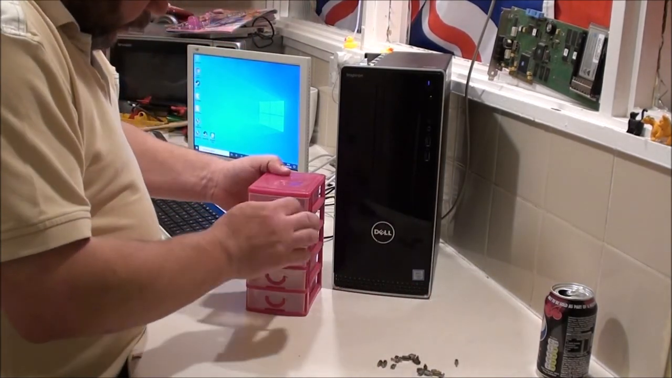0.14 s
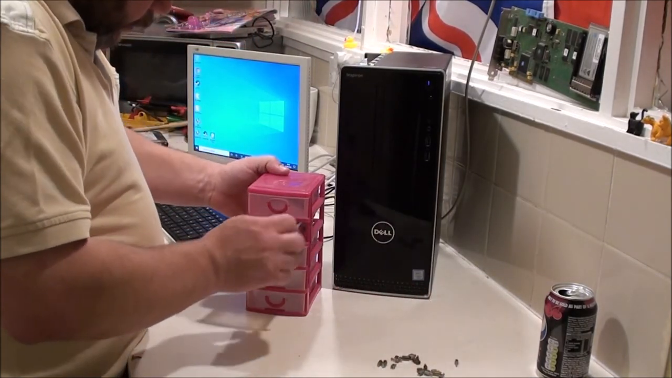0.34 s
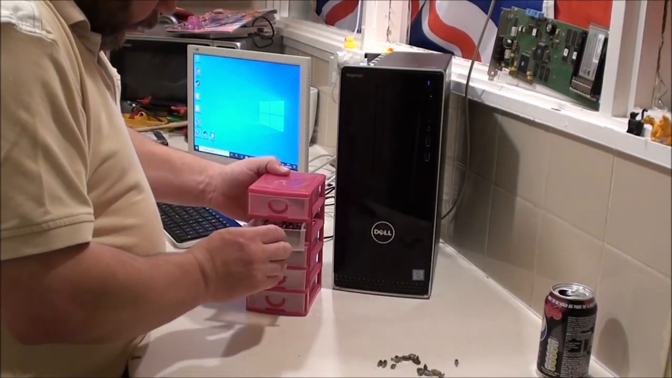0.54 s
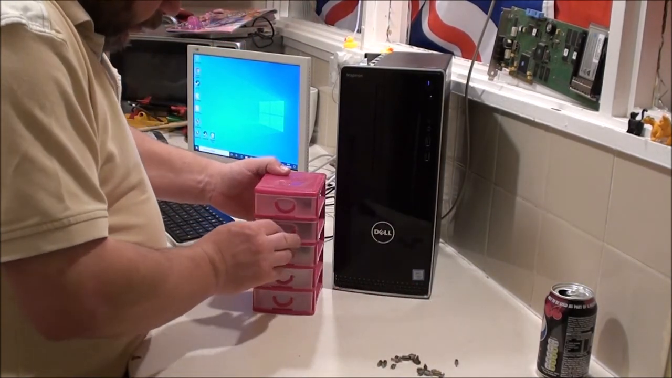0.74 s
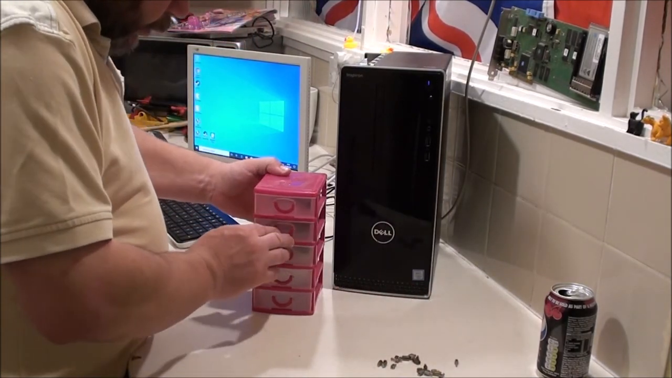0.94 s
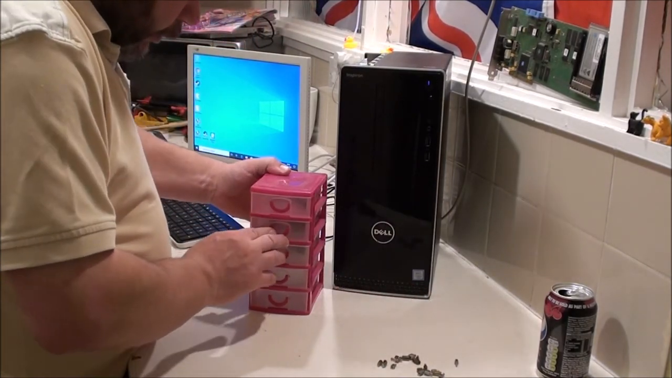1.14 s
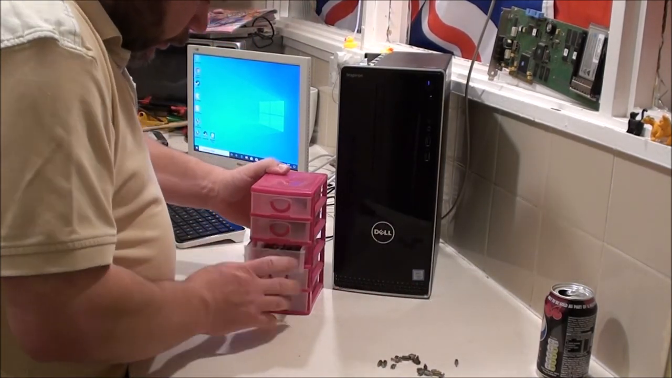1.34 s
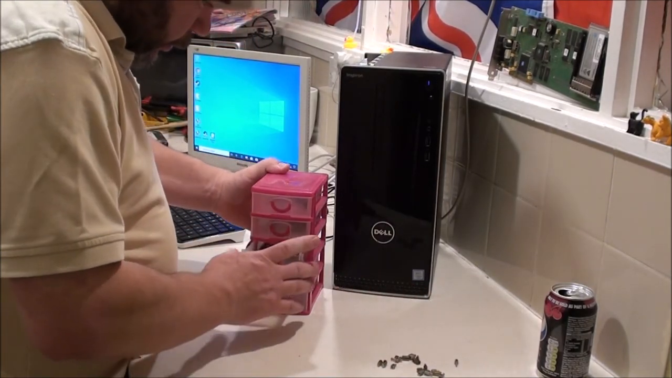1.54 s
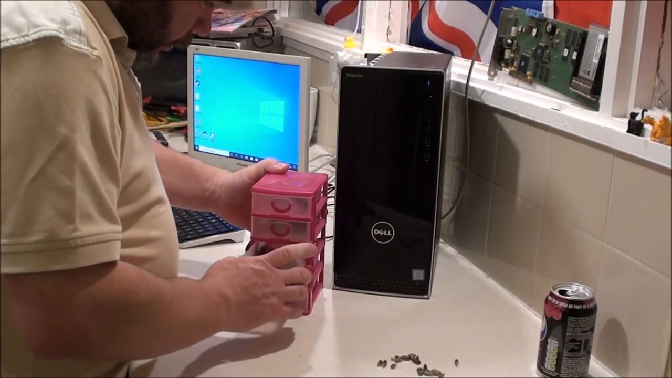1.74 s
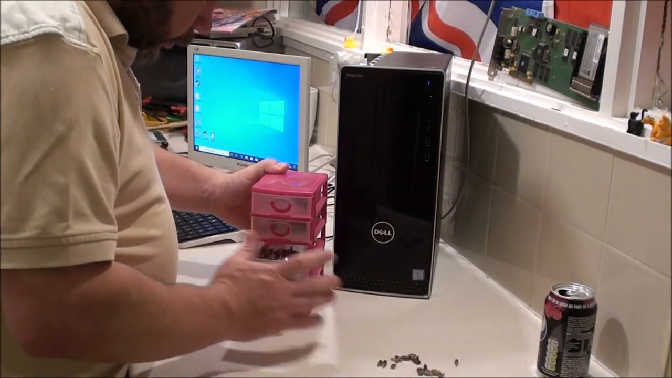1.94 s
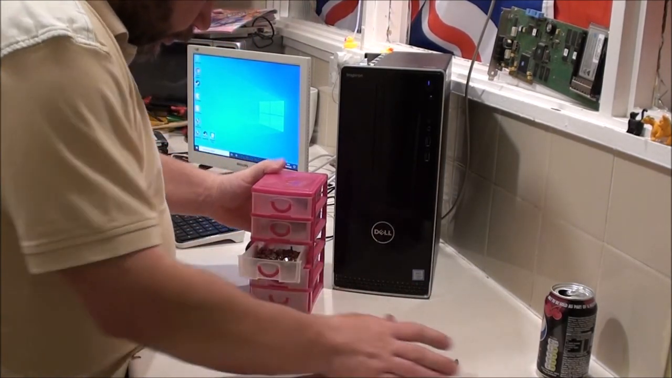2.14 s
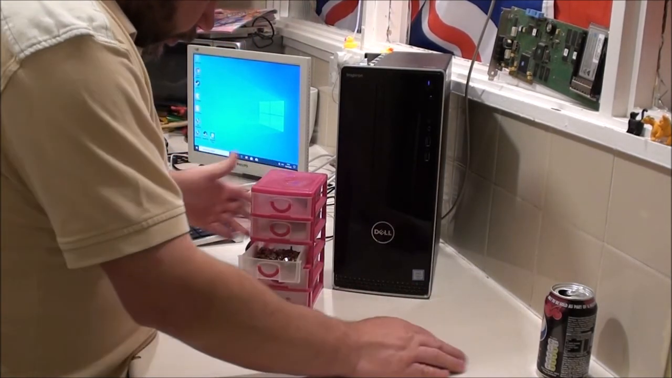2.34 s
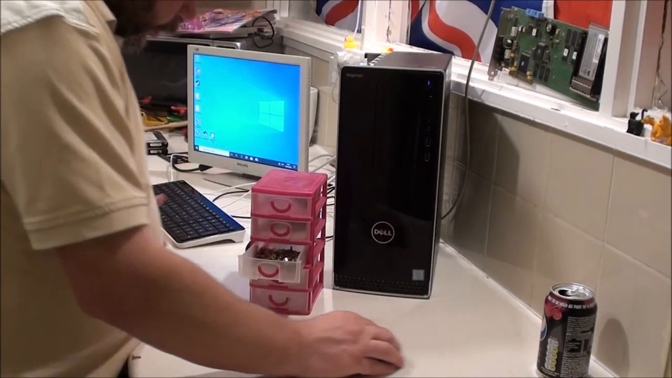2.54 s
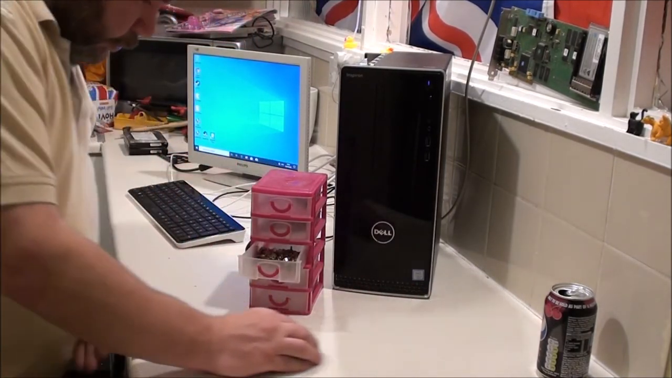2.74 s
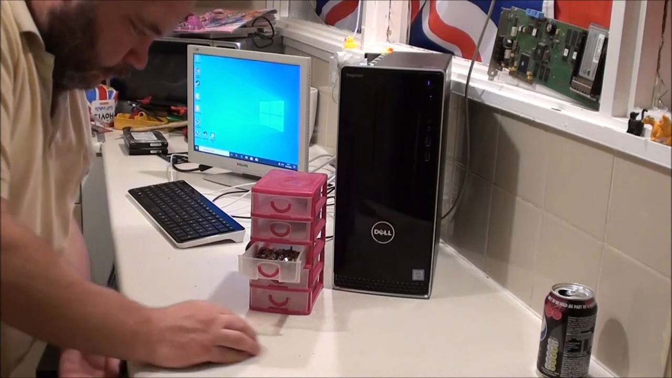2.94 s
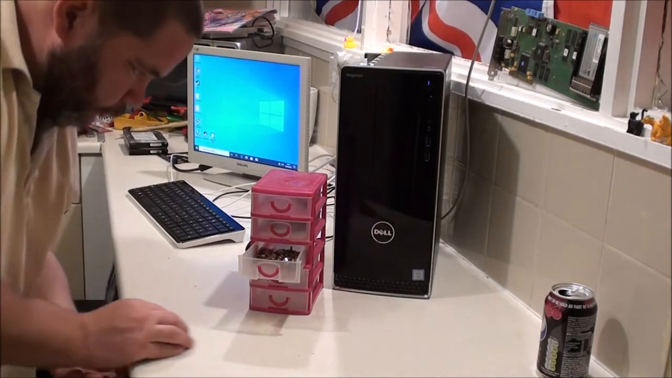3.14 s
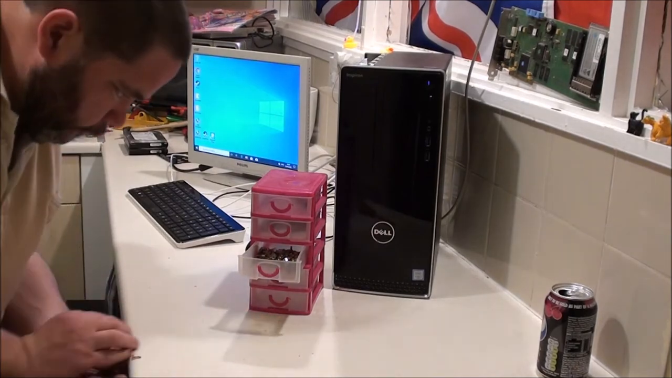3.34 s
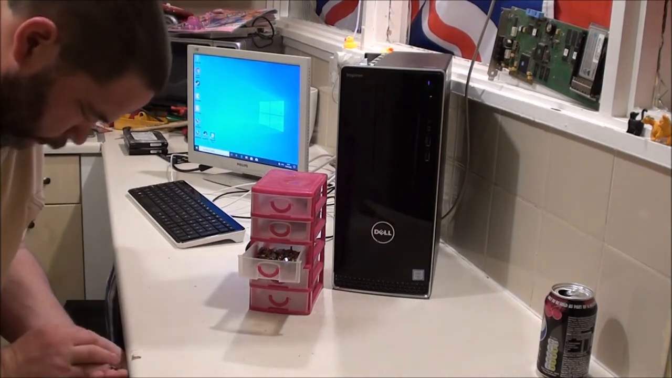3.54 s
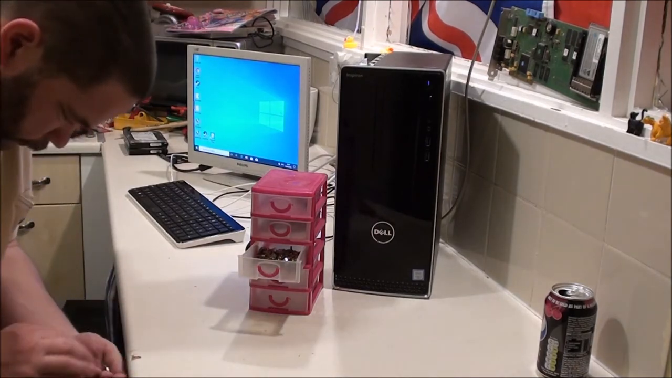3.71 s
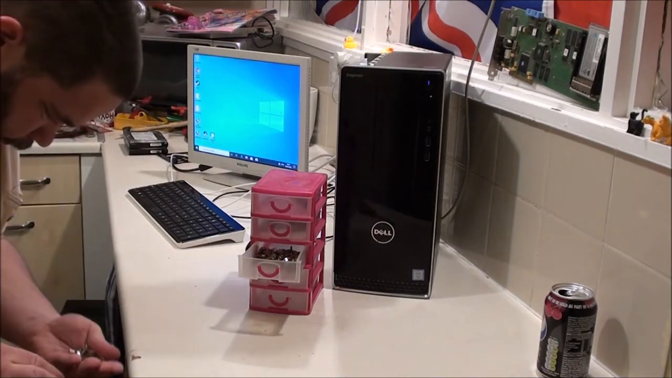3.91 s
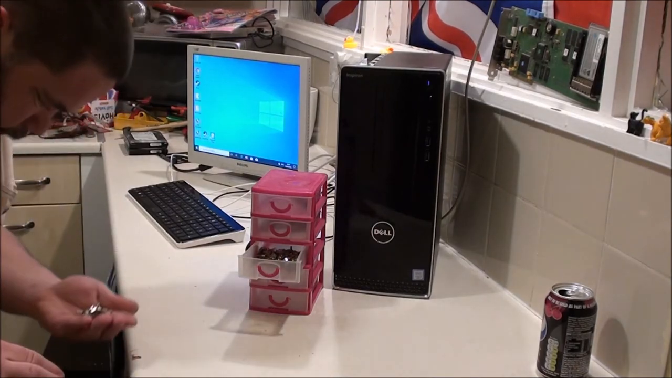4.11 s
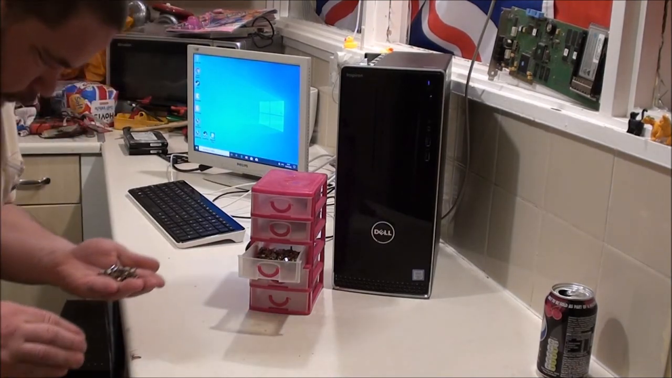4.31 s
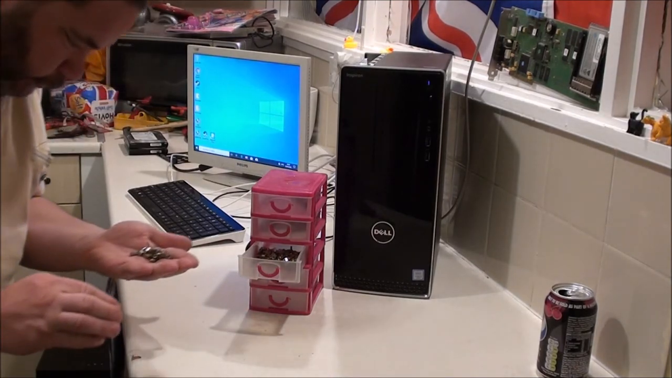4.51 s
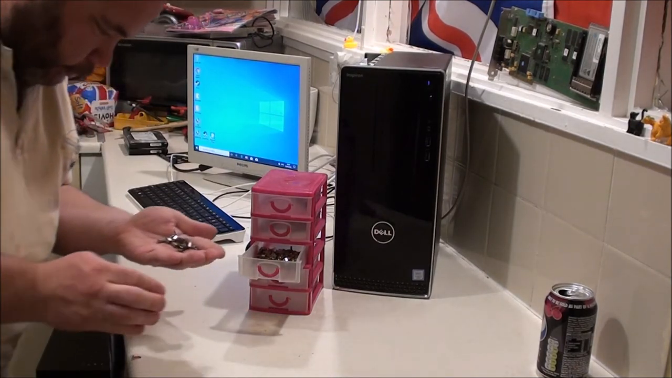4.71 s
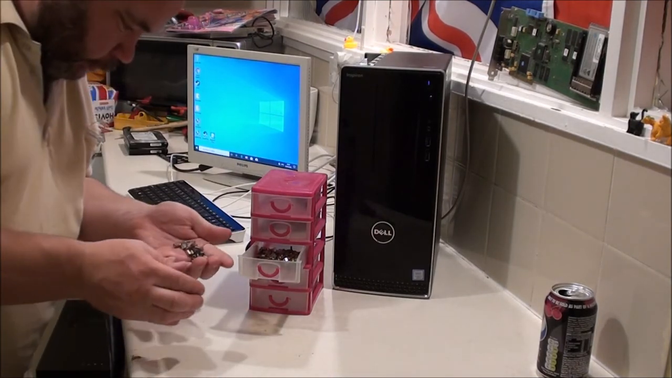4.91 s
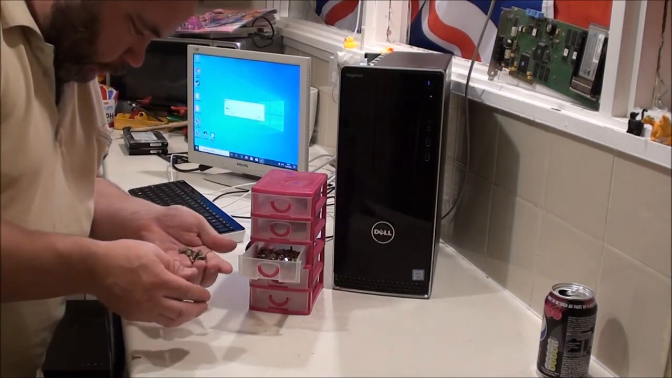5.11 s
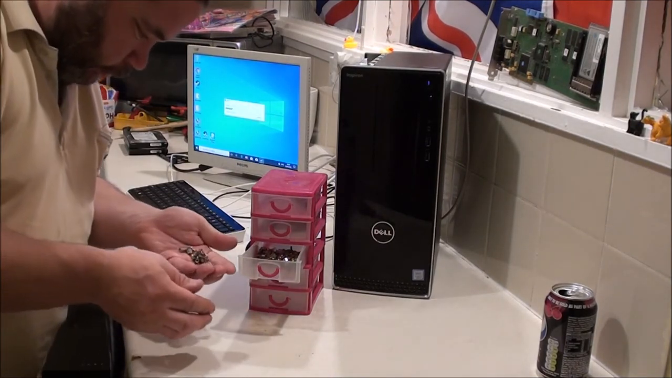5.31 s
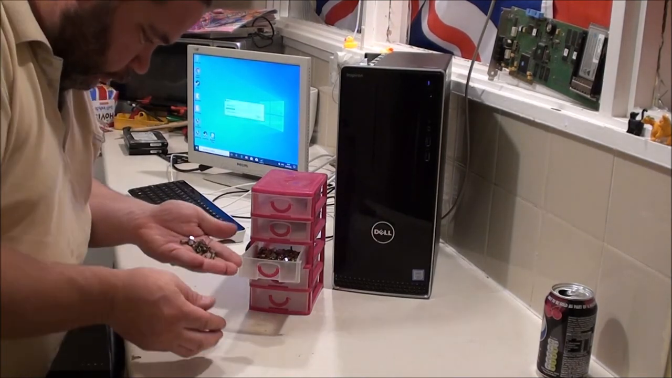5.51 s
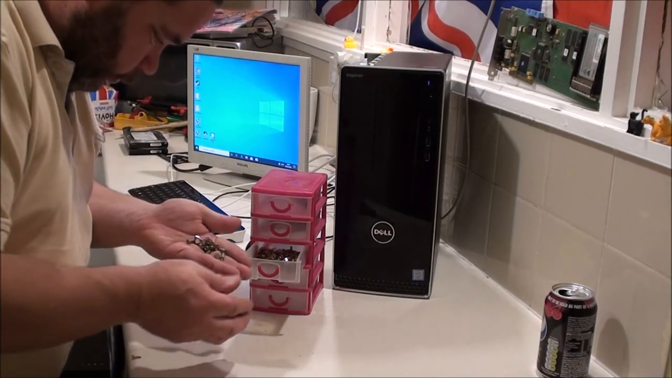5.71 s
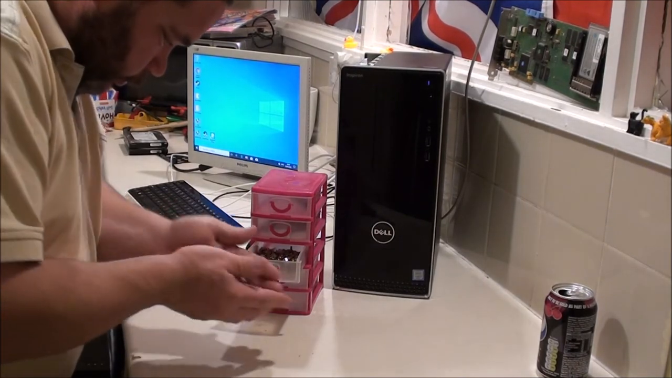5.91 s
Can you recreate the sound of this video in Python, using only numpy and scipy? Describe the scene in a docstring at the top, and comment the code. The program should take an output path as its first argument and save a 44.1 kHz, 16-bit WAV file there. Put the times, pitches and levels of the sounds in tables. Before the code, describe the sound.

Irregular loud clacks of hard plastic, each with a burst of jingling screws, open the scene. After a brief soft brush of the hand, many tiny screws roll and scrape along the hard surface for about a second, with short squeaks. The end is quiet: faint clicks and fine rustles in the hands. Heard close, in a small room with short reflections and a steady fan-like background.

```python
"""Screw drawers on a worktop

Small tiled room, stereo microphone close by: plastic drawers full of small screws are tugged open and
knocked shut, each jolt a crack of noise, then chattering grains ringing through cavity and wall.
A hand then sweeps loose screws along the worktop into the other palm, as dense clumped contacts in
resonances with short squeaks, and turns them over, as fine grain that swells and fades.
Sharp ticks and dull bumps stand out; coloured noise makes a low machine rumble, hiss and faint whine.
"""
import sys
import numpy as np
from scipy import signal
from scipy.fft import rfft, irfft, next_fast_len
from scipy.io import wavfile

SR = 44100
rng = np.random.default_rng(int(sys.argv[2]) if len(sys.argv) > 2 else 0)


def file_out(sig):
    """Save sig as 16-bit WAV at sys.argv[1]."""
    # one column per channel
    cols = np.atleast_2d(sig).T
    # limit, then scale
    lim = np.clip(cols, -1, 1)
    pcm = np.round(lim * 32767).astype(np.int16)
    wavfile.write(sys.argv[1], SR, pcm)


N = 262836
T = np.arange(N) / SR
# All source levels are as they stand before the room and the microphone gains.


def amp(db):
    """Amplitude factor of a level in dB."""
    return 10 ** (np.asarray(db) / 20)


def rms_one(x):
    """Scale to rms 1."""
    return x / np.sqrt(np.mean(x ** 2) + 1e-20)


def in_time(rows):
    """Columns over time; the first one is silent outside the table."""
    s, first, *rest = np.transpose(rows)
    level = np.interp(T, s, first, left=-120, right=-120)
    return [level] + [np.interp(T, s, column) for column in rest]


def filtered(x, order, hz, kind):
    """Butterworth filter."""
    return signal.sosfilt(signal.butter(order, hz, kind, fs=SR, output="sos"), x)


def colour(x, spectrum, peaks=()):
    """Causal (minimum phase) filter of a smooth spectrum with resonances added to it."""
    size = next_fast_len(N + 8192)
    hz = np.maximum(np.arange(size // 2 + 1) * SR / size, 1)
    spectrum_hz, spectrum_db = np.transpose(spectrum)
    gain = amp(np.interp(np.log(hz), np.log(spectrum_hz), spectrum_db))
    gain *= 1 + sum(amp(db) / (1 + (2 * (hz - f) / width) ** 2) for f, width, db in peaks)
    # folding the cepstrum onto positive time gives the minimum phase
    cepstrum = irfft(np.log(gain), size)
    cepstrum[1:size // 2] *= 2
    cepstrum[size // 2 + 1:] = 0
    response = np.exp(rfft(cepstrum))
    return irfft(rfft(x, size) * response, size)[..., :N] / np.sqrt(np.mean(gain ** 2))


def thirds(x):
    """Low, middle and treble part, each of rms 1; signs alternate so that neighbours add up."""
    low = -rms_one(filtered(x, 2, 1800, "low"))
    middle = rms_one(filtered(x, 2, [1800, 4800], "band"))
    treble = -rms_one(filtered(x, 2, 4800, "high"))
    return low, middle, treble


def grains(per_s, spread_db):
    """Random contacts of uneven size, rms 1; a larger spread makes them more uneven."""
    sizes = amp(spread_db * np.minimum(rng.exponential(1, N), 5)) * rng.choice([-1, 1], N)
    return rms_one(sizes * (rng.random(N) < per_s / SR))


def drift(rate):
    """Slow random wander, rms 1; rate in Hz."""
    r = np.exp(-2 * np.pi * rate / SR)
    wander = signal.lfilter([1], [1, -2 * r, r * r], rng.standard_normal(N + SR))
    return rms_one(wander[SR:])   # the first second settles the filter


def burst(s, rise, t60):
    """First sample and envelope, at most half a second, of a sound that rises fast and dies."""
    t = np.arange(min(round(.5 * SR), N - round(s * SR))) / SR
    envelope = (1 - np.exp(-t / max(rise, 1e-4))) * amp(-60 * t / max(t60, .003))
    return round(s * SR), envelope


def resonance(x, hz, width):
    """One resonance, its gain about 1 on top; width in Hz."""
    r = np.exp(-np.pi * width / SR)
    poles = [1, -2 * r * np.cos(2 * np.pi * hz / SR), r * r]
    return signal.lfilter([(1 - r * r) / 2, 0, (r * r - 1) / 2], poles, x)


def clinks(per_s, width_hz):
    """Screw on screw: each contact rings briefly at one of many high pitches; rms 1."""
    contacts, dealt = grains(per_s, 0.98), rng.integers(0, 14, N)
    pitches = np.geomspace(4200, 11500, 14)
    return rms_one(sum(resonance(contacts * (dealt == k) + 1e-18, hz, width_hz)
                       for k, hz in enumerate(pitches)))


# rumble and hiss under the whole scene: f/Hz, relative spectral level/dB
GROUND_SPECTRUM = [(20, -25), (50, 0), (70, -5), (200, -1.5), (500, -7.5), (1000, -9.5), (2500, -14),
                   (6000, -15.5), (11000, -16.5), (15800, -19.5)]
# narrow bands in it: f/Hz, width/Hz, height added to the spectrum, relative to it/dB
WHINE_BANDS = [(125, 20, 0), (206, 20, 4), (353, 20, 3), (651, 30, 1), (3390, 90, 6.5), (3500, 110, 7),
               (4720, 160, -2), (10400, 120, -2)]
# slowly changing level of the background as the microphone hears it: t/s, mid level/dB
GROUND_HEARD = [(0.0, -44), (1.9, -42), (3.5, -38), (4.6, -40), (5.96, -41)]
# spread of the background across the stereo microphone: f/Hz, relative side level/dB
GROUND_SPREAD = [(60, -24), (150, -18.5), (380, -4.5), (950, 2), (2380, -1.5), (5980, -6), (15000, -26)]


def ground():
    """Rumble, hiss and whine as coloured noise, slightly uneven; the level heard rises and falls."""
    noise = rms_one(colour(rng.standard_normal((2, N)), GROUND_SPECTRUM, WHINE_BANDS))
    mid, side = amp(in_time(GROUND_HEARD)[0] + 0.087 * drift(0.55)) * noise
    return mid, amp(-13.5) * colour(side, GROUND_SPREAD)


# drawer jolts: t/s, nominal peak level/dB, rise/s, rattle t60/s, cavity f/Hz, cavity share/dB,
# wall f/Hz, treble share/dB
DRAWER_JOLTS = [(0.0711, -16, 0.00055, 0.18, 1420, -8, 2100, -30),
                (0.1389, -16.5, 0.0009, 0.051, 1160, -3, 3150, 11.5),
                (0.155, -24.5, 0.0031, 0.26, 1180, -7, 1970, 3.5),
                (0.215, -35, 0.0025, .25, 660, -26, 3000, -9),
                (0.2341, -11, 0.0014, .11, 1090, 9.5, 1990, 9.5),
                (0.261, -11, .003, 0.16, 1240, -2, 2110, -2.5),
                (0.2859, -23.5, .003, 0.34, 1290, -1.5, 2760, 1),
                (0.349, -25.5, 0.0014, 0.16, 1300, 4, 2000, 4),
                (0.4793, -25, 0.0012, 0.15, 1170, -16, 2960, -25),
                (0.511, -15.5, .0019, 0.12, 1200, -5, 1930, 1),
                (0.5696, -28, .003, 0.18, 1220, -20, 2060, -10),
                (0.624, -22, 0.0021, 0.1, 1170, -20, 1980, -22),
                (0.684, -10, 0.0043, 0.097, 950, 3.8, 2010, 10),
                (0.689, -7.5, 0.0017, 0.28, 1440, -21, 2760, -1),
                (0.7114, -11.5, 0.00093, 0.22, 810, -2, 3300, -19),
                (0.771, -20, .0059, 0.14, 930, -4, 2540, -7),
                (0.93, -26.5, 0.0045, 0.12, 1130, 10.5, 3820, 18),
                (0.9396, -5, 0.0072, 0.2, 780, -4, 2970, 4), (0.96, -15, .0014, 0.16, 713, -1.5, 2540, -17),
                (1.1595, -42.5, 0.0021, 0.16, 970, 7.5, 2950, -26),
                (1.2273, -31, 0.0029, 0.061, 958, 1, 3470, 15.5),
                (1.283, -19.5, 0.00071, 0.17, 750, -3.5, 3520, 4.5),
                (1.319, -24, 0.0034, 0.097, 1060, 5, 3300, 4),
                (1.4002, -4, 0.012, .19, 1130, -11.5, 3800, -2),
                (1.4314, -25, .0037, 0.33, 1140, 1, 3180, -28),
                (1.507, -22.5, .0014, 0.096, 1090, -14, 3750, -3),
                (1.5745, -18, 0.0016, 0.2, 1250, -22, 3360, -27),
                (1.5914, -35, 0.0041, 0.093, 1140, 1, 3400, -20),
                (1.648, -22.5, 0.0018, 0.19, 1230, -17, 3800, -11),
                (1.6621, -30.5, 0.0038, 0.17, 1400, 5, 3350, -20),
                (1.7067, -25, 0.0032, 0.07, 1420, -17, 3280, 0),
                (1.7809, -32, 0.0038, 0.062, 1270, 3, 1700, -3),
                (1.8063, -34, .003, .06, 1310, -5, 3240, 0),
                (1.822, -28, 0.0028, 0.086, 1080, -8, 2980, 10)]
# drawers sliding in the frame: t/s, middle-band level/dB before its drift
DRAWER_SLIDE = [(0.0, -34), (0.172, -54), (0.32, -81), (0.542, -37.5), (0.65, -34.5), (0.87, -56),
                (0.92, -47), (1.12, -51.5), (1.286, -42), (1.45, -32), (1.558, -51), (1.688, -37.5),
                (1.834, -48.5), (1.95, -54)]
# smooth colour of the drawer sounds: f/Hz, relative spectral level/dB
DRAWER_SPECTRUM = [(120, -120), (300, -22.5), (500, -10.5), (800, -7), (1500, -4.5), (4000, -3), (7500, 5),
                   (10000, -2), (13000, -10), (15800, -24)]
# drawer wall resonances: f/Hz, width/Hz, height added to the colour, relative to it/dB
DRAWER_WALLS = [(1800, 42, -14), (2600, 67, -49), (3150, 190, -4.5), (4970, 150, -6.5), (6060, 840, -2.5)]
CREST_DB, CRACK_DB = 6, 3   # allowance for a noisy burst's peak over its rms; crack share
WALL_DB, WALL_FADES = -19, 0.81   # wall ring at a 0 dB jolt; dB gained per dB the jolt is lighter
SLIDE_CAVITY_DB, SLIDE_TREBLE_DB = 3.5, 3   # low and treble shares against the middle
SLIDE_WALL_HZ, SLIDE_WALL_DB = 1900, -14.5   # the wall that sings while a drawer slides


def drawers():
    """Jolts crack, then screws chatter; cavity and wall ring at each jolt's own pitches."""
    low, middle, treble = thirds(colour(grains(3500, 1.03), DRAWER_SPECTRUM, DRAWER_WALLS))
    treble = rms_one(treble + amp(-17.5) * clinks(360, 150))
    snap = filtered(colour(rng.standard_normal(N), DRAWER_SPECTRUM), 2, 1500, "high")
    sings = amp(SLIDE_WALL_DB) * rms_one(resonance(middle, SLIDE_WALL_HZ, 250))
    sliding = middle + sings + amp(SLIDE_CAVITY_DB) * low + amp(SLIDE_TREBLE_DB) * treble
    out = amp(in_time(DRAWER_SLIDE)[0] + 1.07 * drift(20)) * sliding
    for s, db, rise, t60, cavity_hz, cavity_db, wall_hz, treble_db in DRAWER_JOLTS:
        at, rattle = burst(s, rise, t60)
        part = slice(at, at + len(rattle))
        # plastic on plastic
        crack = amp(CRACK_DB) * burst(s, 0.00013, 0.0048)[1] * rms_one(snap[part])
        lasting = burst(s, rise, 1.24 * t60)[1]   # the air in the cavity rings on a little
        air = rms_one(resonance(low[part], cavity_hz, 150))
        cavity = .7 * low[part] * rattle + air * lasting
        wall = amp(WALL_DB - WALL_FADES * db) * rms_one(resonance(middle[part], wall_hz, 120))
        chatter = rattle * (middle[part] + wall)
        chatter += amp(treble_db) * rattle ** 1.17 * treble[part]   # treble dies sooner
        out[part] += amp(db - CREST_DB) * (chatter + amp(cavity_db) * cavity + crack)
    return out


# single sharp ticks of a screw or a plastic edge: t/s, peak level/dB, ring f/Hz, duller knock share/dB
SHARP_TICKS = [(0.074, -4, 6560, -16), (0.1394, -7, 8600, -11), (0.1558, -7, 7780, -17),
               (0.219, -26, 3120, -12), (0.234, 2.5, 8700, -21), (0.2885, -7, 2700, -9),
               (0.351, -11, 5500, 6), (0.4825, -35, 2940, -9), (0.5729, -12, 5990, -15),
               (0.692, -12, 3030, -9), (0.713, 3, 3300, -11), (1.1636, -36, 3960, -7),
               (1.271, -19, 8550, -14), (1.285, -8.5, 3500, -14), (1.507, -11.5, 3880, -17),
               (1.5772, -12.5, 5400, -17), (1.5925, -14.5, 1900, -20), (1.651, -13, 4000, -11),
               (1.661, -14, 1950, -13), (1.715, -17, 5300, -15), (1.8063, -24, 4100, -17),
               (1.8235, -18, 6450, -21), (1.833, -14, 5900, -26), (2.299, -27, 3760, -11),
               (2.3415, -4, 9000, -21), (2.503, 2, 10700, -13), (3.4224, -24, 8040, -16),
               (3.43, -8.5, 10500, -18), (3.4644, -15.5, 8440, -16), (3.478, -14.5, 1000, -13),
               (3.545, -22, 9500, -17), (3.6484, -21, 1230, -8), (3.9735, -25, 9300, -7),
               (4.1044, -29, 7480, -27), (4.392, -27, 5100, -18), (4.55, -38, 4800, -23),
               (4.59, -32, 4840, -21), (4.62, -40, 4820, -17), (4.645, -39, 4750, -18),
               (4.671, -29, 8100, -12), (4.7395, -33, 6500, -13), (4.81, -40, 4600, -21),
               (4.85, -31, 4550, -21), (4.8876, -29, 4850, -17), (4.9387, -31, 10000, -19),
               (5.4435, -25, 7100, 2), (5.454, -35, 500, -12), (5.4894, -32, 6210, -8),
               (5.684, -27, 6070, -17)]


def ticks():
    """A hard contact: a few milliseconds of noise and ring over a duller knock, scaled to its peak."""
    noise, out = rms_one(colour(rng.standard_normal(N), SWEEP_SPECTRUM)), np.zeros(N)
    knock = rms_one(resonance(noise, 2800, 1500))
    for s, db, hz, knock_db in SHARP_TICKS:
        at, shape = burst(s, rise=.0002, t60=.012)
        part = slice(at, at + len(shape))
        tone = np.sin(2 * np.pi * hz * T[:len(shape)])
        rough = rms_one(resonance(noise[part], hz, 0.15 * hz))
        ring = 0.8 * noise[part] + tone + 0.4 * rough
        tick = shape * (ring + amp(knock_db) * knock[part])
        out[part] += amp(db) * tick / np.max(np.abs(tick))
    return out


# palm or drawer bumping the worktop: t/s, relative level/dB, f/Hz, t60/s
WORKTOP_BUMPS = [(0.519, -37, 124, 0.19), (0.703, -31, 231, 0.16), (0.942, -23.5, 167.7, 0.18),
                 (1.29, -46.5, 210, 0.55), (2.3, -36.5, 90, 0.18), (3.069, -23.5, 76, 0.11)]


def bumps():
    """A soft push rings the worktop's low bending mode inside a broad dull thud."""
    thud = rms_one(filtered(rng.standard_normal(N), 3, [110, 290], "band"))
    out = np.zeros(N)
    for s, db, hz, t60 in WORKTOP_BUMPS:
        at, shape = burst(s, 0.014, t60)
        part = slice(at, at + len(shape))
        mode = np.sin(2 * np.pi * hz * T[:len(shape)])
        out[part] += amp(db) * shape * (1.2 * mode + 1.9 * thud[part])
    return out


# skin and screws shifting in the hands: t/s of the crest, treble level/dB, swell/s, fade/s,
# lower share/dB
HAND_RUBS = [(2.124, -34.5, 0.15, 0.017, -19), (2.21, -32.5, 0.15, 0.41, -12.5),
             (3.462, -28, 0.018, 0.068, -4.5), (3.52, -48, 0.023, 0.48, -10),
             (3.652, -40, 0.0049, 0.077, 1.5), (3.83, -36.5, 0.083, 0.071, -17),
             (3.975, -42, .005, 0.25, -11), (4.12, -55, 0.046, 0.09, -8), (4.3, -44, 0.061, 0.19, 3.3),
             (4.8, -50, .45, 0.17, -2.5), (4.94, -48, .011, 0.055, -20), (5.135, -38.5, 0.066, 0.12, -4),
             (5.39, -43, 0.034, 0.032, -4), (5.446, -33.5, 0.017, 0.042, 1), (5.5, -47.5, 0.025, 0.057, 2),
             (5.69, -44.5, 0.027, 0.04, .4), (5.92, -44, 0.011, 0.12, -12)]
# smooth colour of the rubbing: f/Hz, relative spectral level/dB
HAND_SPECTRUM = [(300, -9.5), (800, -9.5), (2500, -6), (5000, 0), (7500, 4.5), (10000, 3.5), (13000, 3),
                 (15800, 7)]
RUB_SPAN_DB = 15   # gained over the swell, lost over the fade
BRIGHT_HZ, BRIGHT_HZ_PER_DB = 6400, 83   # the thinner a rub, the higher its bright band


def hands():
    """Soft rubbing: fine, nearly smooth grain that swells and fades, each rub with its bright band."""
    low, middle, treble = thirds(colour(grains(9000, 0.58), HAND_SPECTRUM))
    out = 0
    for s, db, swell, fade, lower_db in HAND_RUBS:
        shape_db = db - RUB_SPAN_DB * np.maximum((s - T) / swell, (T - s) / fade)
        band = rms_one(resonance(treble, BRIGHT_HZ - BRIGHT_HZ_PER_DB * lower_db, 3200))
        bright = rms_one(treble + 11.0 * band)
        out = out + amp(shape_db) * (bright + amp(lower_db) * (middle + 0.88 * low))
    return out


# rings that come and go under the dragged screws: f/Hz
STRAND_PITCHES = [1724, 2084, 2284, 2930, 3300, 3750, 4390]
STRAND_WIDTH_HZ, STRAND_DB, STRAND_SWING_DB = 50, -10, 4.5   # the swing is rms


def strands(x):
    """Narrow rings, each swelling and fading on its own as screws roll over; rms 1."""
    return rms_one(sum(amp(STRAND_SWING_DB * drift(9.7)) * rms_one(resonance(x, hz, STRAND_WIDTH_HZ))
                       for hz in STRAND_PITCHES))


# screws dragged on the worktop: t/s, middle-band level/dB, screw treble share/dB, both before drift
SCREW_SWEEP = [(2.29, -47, 5), (2.324, -40, 10), (2.339, -33, 5), (2.343, -29.5, 14.5), (2.36, -23.5, 3),
               (2.41, -23, -0.5), (2.438, -20.5, 8.5), (2.53, -19, 2.2), (2.65, -16, -2), (2.886, -19, -5),
               (2.922, -20, -5.5), (3.048, -15, 1), (3.142, -20, -6), (3.212, -17.5, -1.5), (3.28, -18, -8),
               (3.374, -17, -1), (3.46, -43, 18)]
# smooth colour of the dragged screws, also of the ticks: f/Hz, relative spectral level/dB
SWEEP_SPECTRUM = [(120, -29), (420, -15), (600, -11), (1300, -6), (2500, -8), (5000, 0), (8300, 11.5),
                  (11000, 0.5), (15800, -15.5)]
# worktop and screw resonances: f/Hz, width/Hz, height added to the colour, relative to it/dB
WORKTOP_RINGS = [(601, 26, 4.5), (825, 24, -0.5), (1090, 190, -3.5), (1498, 27, 5), (2180, 67, -24),
                 (2443, 24, 4), (6370, 85, 3.5), (8100, 450, -26)]
# the hand closes over the heap and its hollow sounds more: t/s, share/dB
HAND_HOLLOW = [(2.3, -12), (2.7, -21), (3.14, -12), (3.21, -5), (3.3, -6), (3.4, 7.5)]
HOLLOW_HZ = 2260
WORKTOP_DB = -6.5   # share of the worktop's low ring, before its drift


def sweep():
    """Dozens of screws roll and scrape: dense uneven contacts into worktop and screw resonances."""
    low, middle, treble = thirds(colour(grains(7000, 2.4), SWEEP_SPECTRUM, WORKTOP_RINGS))
    treble = rms_one(treble + amp(-8) * clinks(640, 230))
    level_db, treble_db = in_time(SCREW_SWEEP)
    hollow_share = amp(np.interp(T, *np.transpose(HAND_HOLLOW)))
    hollow = hollow_share * rms_one(resonance(middle, HOLLOW_HZ, 990))
    rolling = amp(STRAND_DB) * strands(middle + low)
    worktop = amp(WORKTOP_DB + 2.6 * drift(7.0)) * low
    screws = amp(treble_db + 2.0 * drift(18)) * treble
    return amp(level_db + 0.18 * drift(33)) * (middle + hollow + rolling + worktop + screws)


# a screw catches and sings for a moment: t/s of the crest, length/s between 1/e points, f/Hz, level/dB
SCREW_SQUEAKS = [(2.617, .05, 3290, -20), (2.717, 0.16, 1464, -25.5), (2.832, 0.088, 1460, -25),
                 (3.105, 0.17, 1450, -28.5), (3.22, 0.061, 2510, -16), (3.368, .05, 3510, -21)]


def squeaks():
    """A narrow, slightly rough ring under a smooth swell."""
    noise = rng.standard_normal(N)
    out = np.zeros(N)
    for s, length, hz, db in SCREW_SQUEAKS:
        swell = np.exp(-(2 * (T - s) / length) ** 2)
        ring = rms_one(resonance(resonance(noise, hz, 40), hz, 40))
        out += amp(db) * swell * ring
    return out


# spread of the room's tail across the stereo microphone: f/Hz, relative side level/dB
ROOM_SPREAD = [(60, -43), (130, -64), (290, -32), (640, -14), (1410, -10), (3100, -10.5), (6820, -8),
               (15000, -26)]
ROOM_T60_S, ROOM_DB = 0.12, -12


def room(x):
    """Two unrelated diffuse tails: one adds to the middle, the other is the width."""
    t = np.arange(round(.6 * SR)) / SR
    tails = rng.standard_normal((2, len(t))) * amp(-60 * t / ROOM_T60_S) * (t > .003)
    tails /= np.sqrt(np.sum(tails ** 2, axis=1, keepdims=True))
    wet, wide = signal.fftconvolve(x[None], tails, axes=1)[:, :N]
    return x + amp(ROOM_DB) * wet, amp(-21.5) * colour(wide, ROOM_SPREAD)


def scene():
    """All sources in the room over the background; the left channel takes slightly more of the middle."""
    sources = drawers() + ticks() + bumps() + hands() + sweep() + squeaks()
    mid, side = np.array(room(sources)) + np.array(ground())
    return np.array([amp(-4.0) * mid + side, amp(-4.5) * mid - side])


def record(dry):
    """The microphone drops the deep bass, peaks are rounded, the top is cut."""
    thin = filtered(dry, 3, 60, "high")
    rounded = .8 * np.tanh(thin / .8)
    return signal.sosfilt(signal.ellip(12, .3, 75, 15850, fs=SR, output="sos"), rounded)


dry = scene()
out = record(dry)
file_out(out)
```